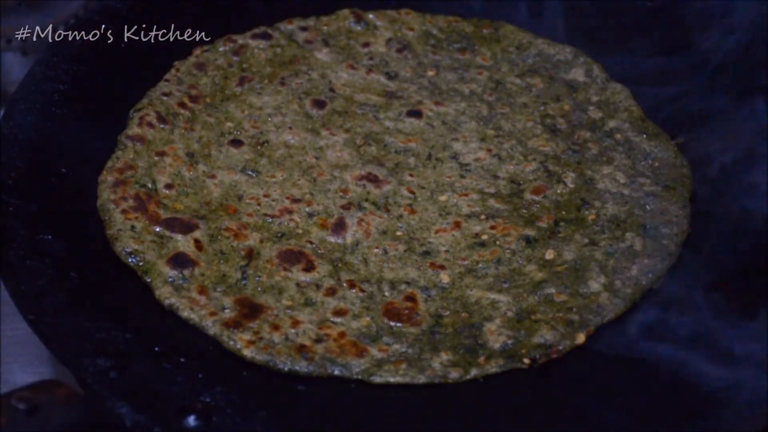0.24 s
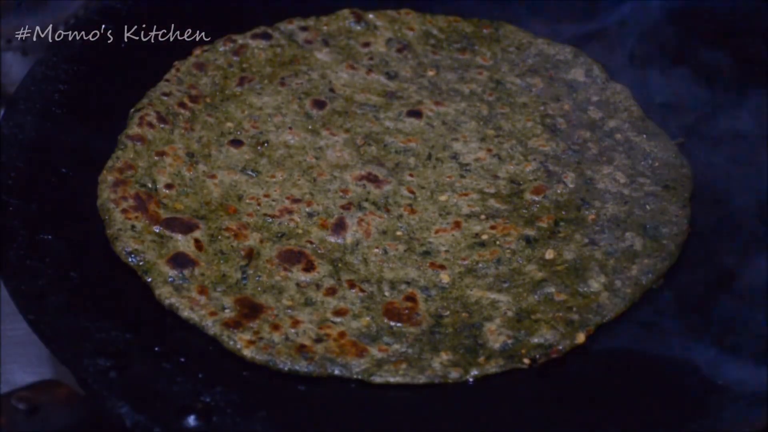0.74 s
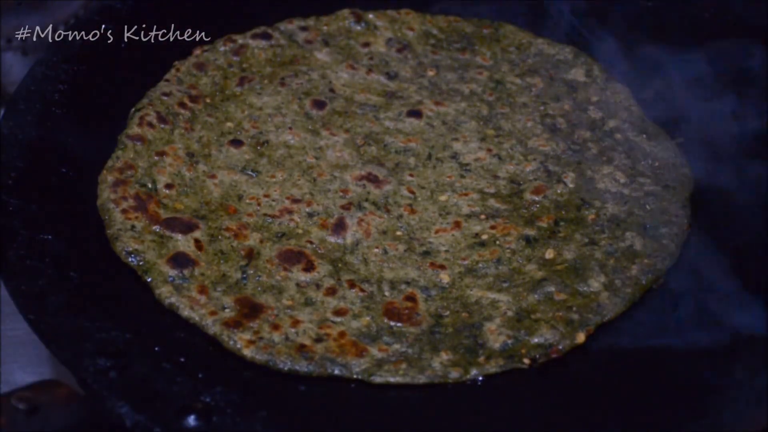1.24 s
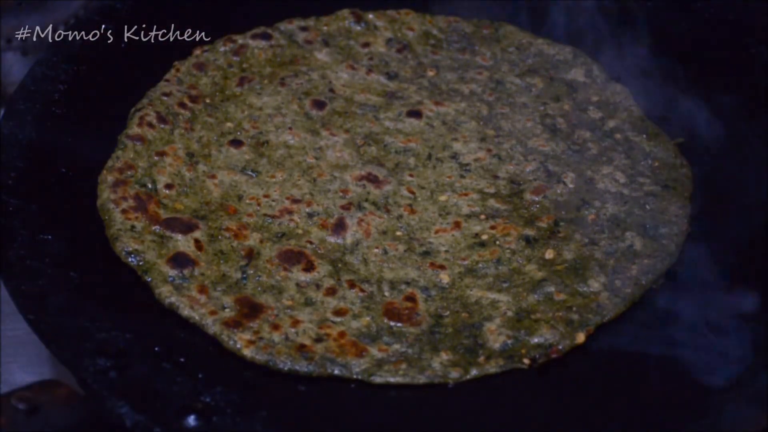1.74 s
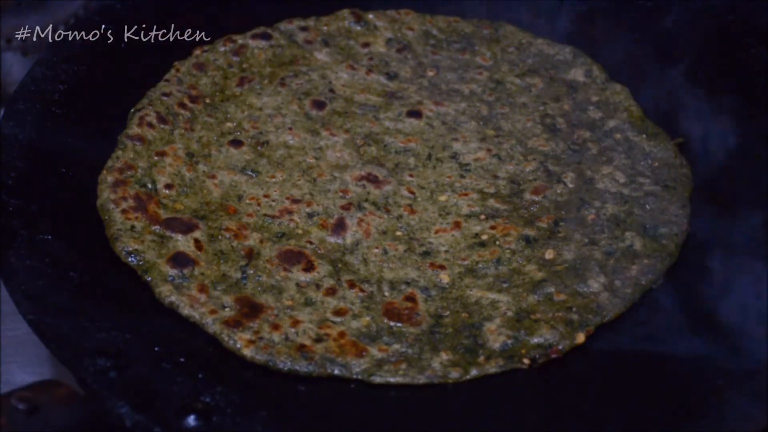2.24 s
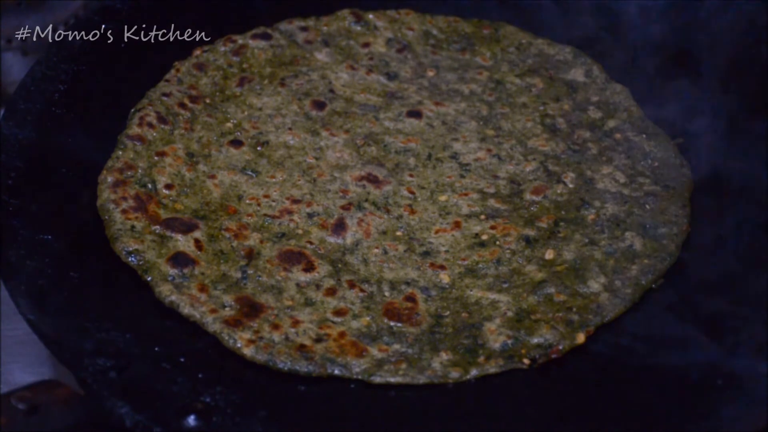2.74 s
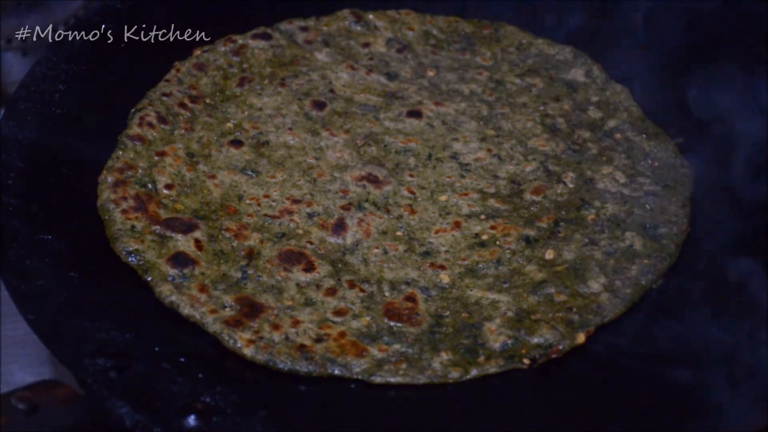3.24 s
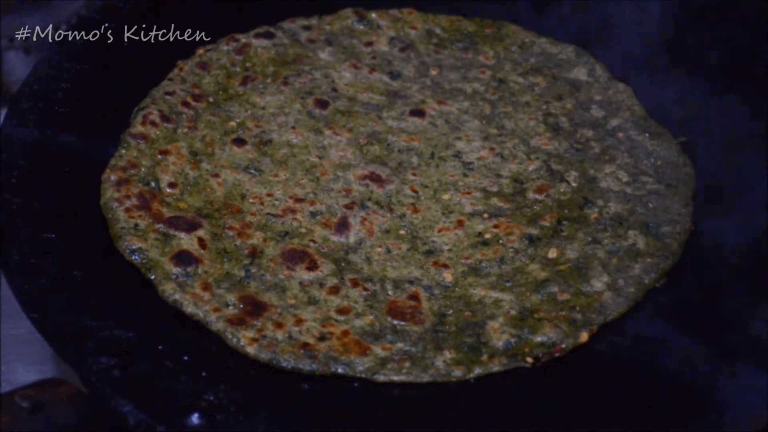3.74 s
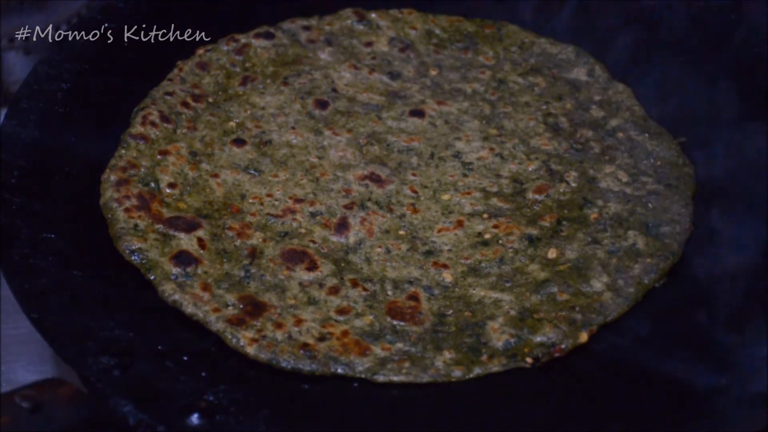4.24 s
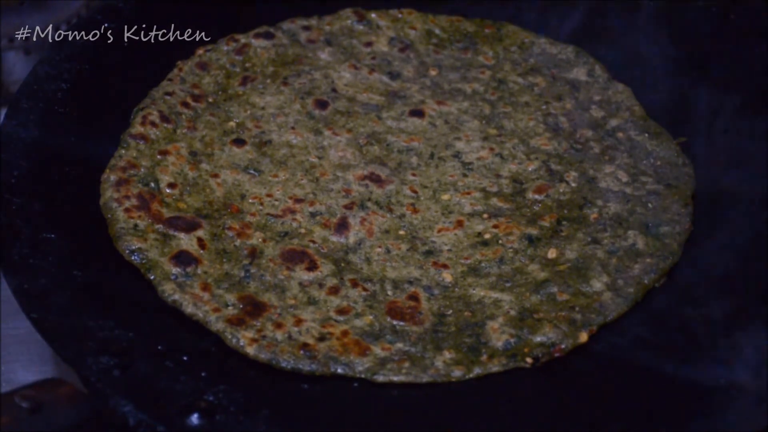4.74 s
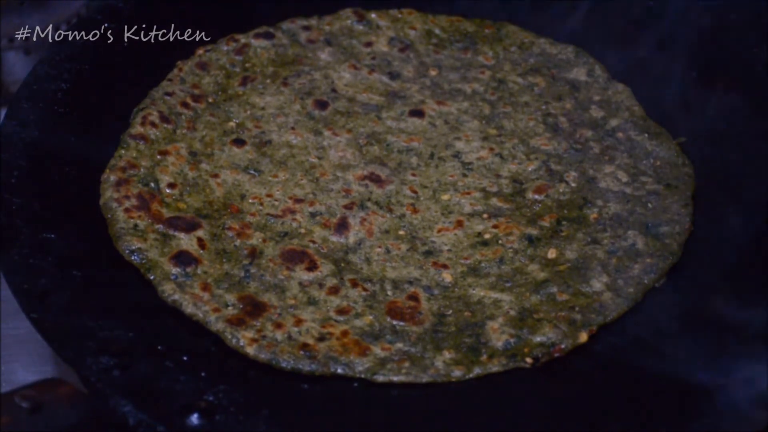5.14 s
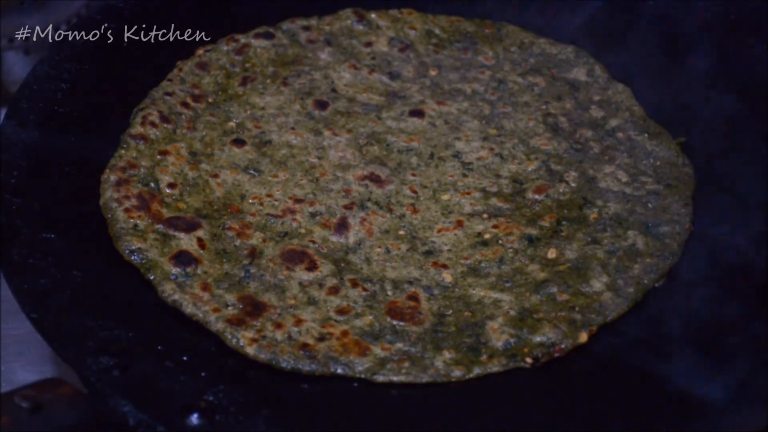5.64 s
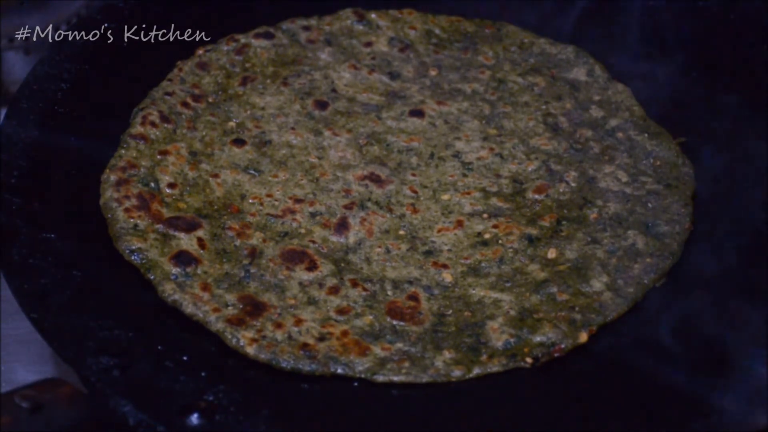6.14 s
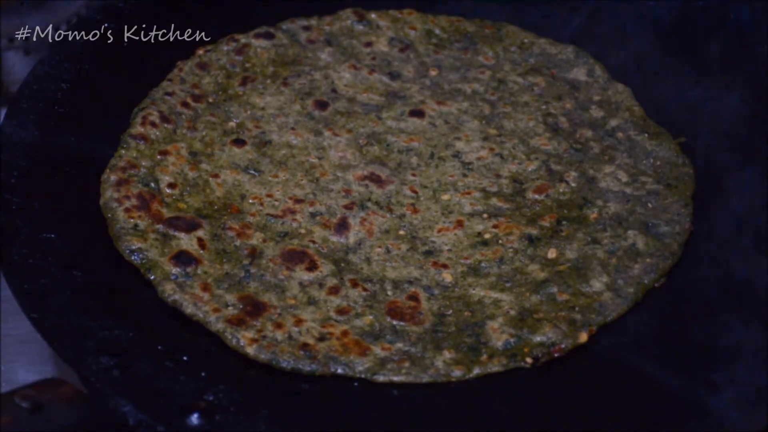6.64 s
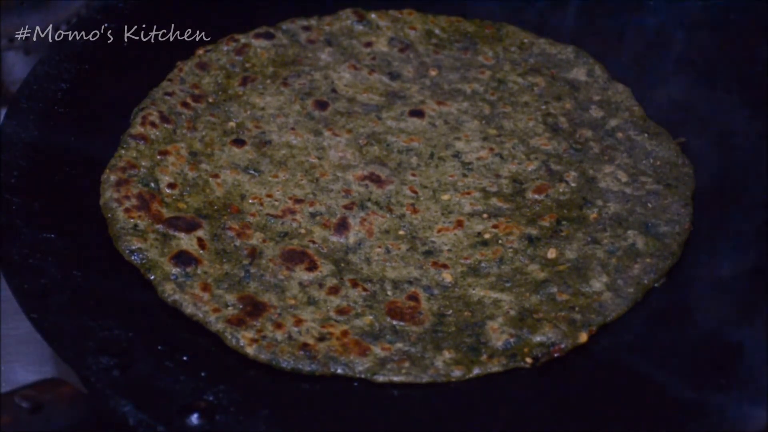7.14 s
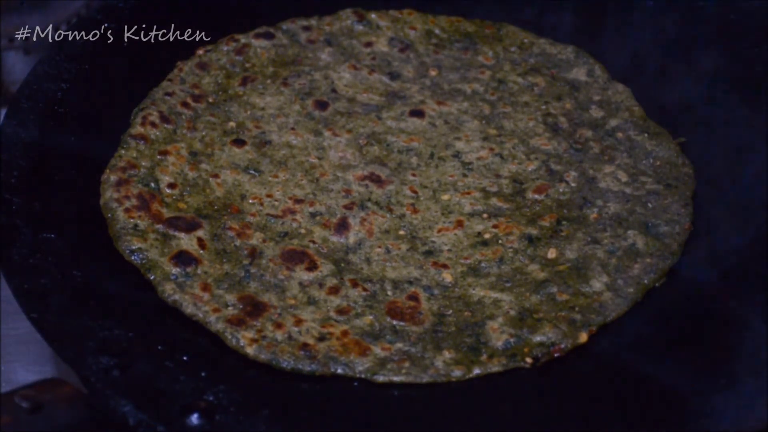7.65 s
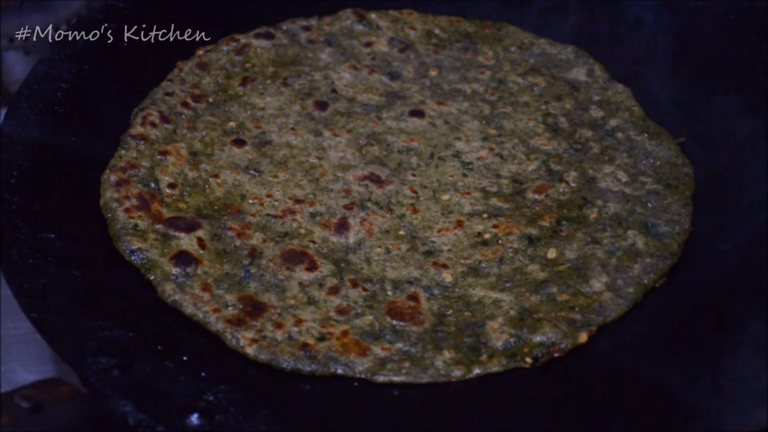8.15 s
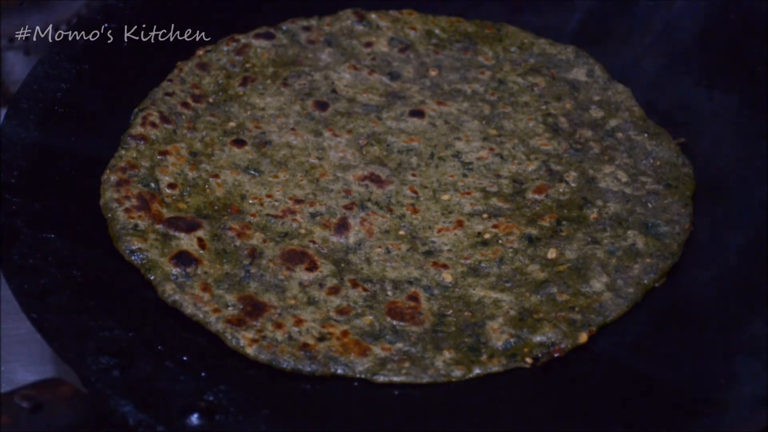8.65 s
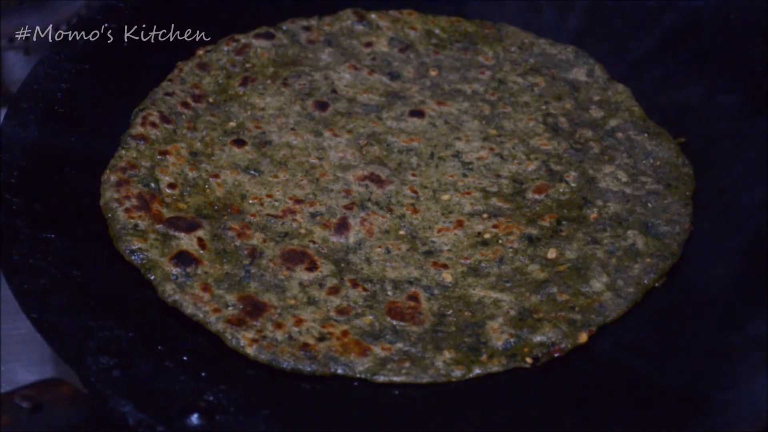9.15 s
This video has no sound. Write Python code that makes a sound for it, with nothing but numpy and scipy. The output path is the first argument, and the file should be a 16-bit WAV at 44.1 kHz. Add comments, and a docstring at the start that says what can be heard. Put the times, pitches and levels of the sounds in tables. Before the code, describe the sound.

Fat spits and pops in sharp irregular bursts as a flatbread fries on an iron griddle, with faint sizzle and low bubbling in a quiet kitchen.

```python
"""A small kitchen, the microphone close to a flatbread frying in ghee on an iron griddle.
Over a quiet stove and low bubbling, dry pops of steam blisters open the scene, then a faint spit and a strong one.
From about two seconds strong spits of fat come often and ring the griddle and the room; pops crowd in after four.
Between them steam seeps out with a faint, uneven sizzle; a spit and a few pops come near the end.
Bubbling, bursts and steam are shaped noise; each pop is a slow pressure pulse, a snap of skin and a fine spray."""
import sys
import numpy as np
from scipy import signal
from scipy.fft import rfft, irfft, next_fast_len
from scipy.io import wavfile
from scipy.ndimage import uniform_filter1d, map_coordinates

SR = 44100
rng = np.random.default_rng(int(sys.argv[2]) if len(sys.argv) > 2 else 0)


def log_audio(samples):
    """Write samples as a 16-bit WAV file to the path given in sys.argv[1]."""
    # one column per channel
    frames = np.atleast_2d(samples).T
    # limit to full scale, then quantise
    limited = np.clip(frames, -1, 1)
    pcm = np.round(limited * 32767).astype(np.int16)
    wavfile.write(sys.argv[1], SR, pcm)


N = 414099

# Quiet of the kitchen and stove. Each row: frequency [Hz], relative density [dB per Hz].
KITCHEN_COLOUR = [(25, 0), (100, 1), (300, -1), (600, 1), (1300, 0), (2000, -2), (2500, -5), (3200, -10),
                  (3900, -12), (4700, -16), (7000, -17.5), (8500, -21), (11000, -23.5), (15000, -28)]
# Low knocks of bubbles under the bread. Each row: frequency [Hz], relative density [dB per Hz].
BUBBLING_COLOUR = [(15, -8), (45, 1), (110, -1), (230, -8), (420, -20), (1000, -45)]
# Low bubbling under the bread. Each row: time [s], level before the bubbling gain [dB].
BUBBLING_LEVELS = [(0, -64), (0.4, -87), (0.95, -69), (1.5, -74), (2.9, -77), (3.7, -72), (4.25, -59),
                   (4.95, -62), (5.15, -70), (6.1, -60), (6.9, -76), (7.8, -77), (7.95, -59), (8.25, -66),
                   (8.5, -58.5), (9.39, -59)]
# Trace of hiss between the ears. Each row: frequency [Hz], relative density [dB per Hz].
SIDE_HISS_COLOUR = [(100, 16.0), (1000, 0), (4000, -3), (12000, 2.5), (16000, 10)]
# Fine fizz of steam through fat. Each row: frequency [Hz], relative density [dB per Hz].
FIZZ_COLOUR = [(1200, -6), (3000, -1), (4200, -1), (5200, 2), (6200, -1), (7600, 1), (9800, -5),
               (11400, -2), (13000, -8), (16000, -19)]
# Narrow jet at the rim of the bread. Each row: frequency [Hz], relative density [dB per Hz].
JET_COLOUR = [(2000, -12), (3500, -9), (4600, -7), (5250, 1), (5900, -7), (7000, -10), (8500, -20),
              (9800, -15), (13000, -27)]
# Wisps of steam fizzing through the fat. Each row: middle [s], length [s], peak before flicker [dB].
STEAM_WISPS = [(0.278, 0.14, -73.5), (1.1, 0.45, -73), (1.6, 0.28, -74), (3.185, 0.11, -69),
               (3.502, .19, -65), (5.143, 0.032, -66.5), (5.417, 0.18, -66), (7.416, 0.15, -72),
               (8.38, .15, -70)]
# Jets of steam from the rim. Each row: middle [s], length [s], peak before flicker [dB].
RIM_JETS = [(2.767, 0.55, -76), (4.683, 0.24, -69), (5.017, 0.091, -75), (6.68, 0.29, -68),
            (8.68, .25, -68.5)]
# Bursting blisters. Each row: snap time [s], puff level before its gain [dB], puff pitch before the
# depth factor [Hz], snap level before its gain [dB], spray level before its gain [dB].
BLISTER_POPS = [(0.1578, -21.5, 264, -20.5, -48), (0.1815, -30.5, 231, -50, -75),
                (0.2055, -37, 276, -33.5, -68), (0.2682, -64, 400, -25, -59),
                (0.9197, -22.5, 213, -42, -89), (1.0632, -14, 147, -21.5, -89),
                (1.1414, -22.5, 306, -23, -64), (1.1702, -56, 342, -29, -46), (1.654, -38, 220, -59, -90),
                (2.08, -25, 129, -65, -85), (2.1183, -28, 250, -28, -63), (2.478, -29.5, 149, -51, -80),
                (2.6307, -30, 186, -52, -89), (2.663, -33.5, 181, -44, -92), (3.2173, -30, 157, -23.5, -55),
                (3.4557, -15, 180, -16.5, -54.5), (4.0023, -22, 197, -20.5, -60),
                (4.2043, -52, 370, -16.5, -59), (4.2126, -33, 142, -64, -90), (4.241, -38, 261, -22, -65),
                (4.307, -23.5, 190, -20, -47.5), (4.379, -34, 175, -23, -66), (4.7414, -32, 233, -36, -77),
                (4.7509, -34, 261, -26.5, -66), (4.77, -31, 170, -17.5, -59), (4.788, -35, 218, -30, -86),
                (4.8163, -43, 291, -21, -61), (4.9112, -25, 242, -23.5, -50.5),
                (4.9458, -22.5, 113, -52, -97), (5.0302, -33, 246, -21.5, -57),
                (5.381, -12.5, 123, -11.5, -50), (5.459, -33, 247, -31.5, -58),
                (5.4854, -27, 180, -28.5, -54), (5.5056, -34, 161, -32.5, -68),
                (5.5913, -18.5, 186, -10.5, -46.5), (5.847, -35, 250, -42, -50),
                (5.8941, -25, 151, -53, -80), (5.9074, -33, 178, -18.5, -59),
                (5.9888, -43, 295, -29.5, -70), (6.0022, -24.5, 195, -31.5, -60),
                (6.1255, -24, 276, -20.5, -56), (6.222, -31, 190, -62, -97), (6.3141, -56, 182, -27.5, -83),
                (6.546, -26, 191, -40, -84), (6.5706, -14, 240, -27, -70), (6.588, -44, 192, -32, -62),
                (7.1556, -21, 273, -44, -80), (7.2725, -14, 332, -22, -44), (7.492, -28.5, 75.5, -57, -90),
                (7.7807, -15.5, 181, -12, -48), (8.339, -24.5, 118, -59, -98), (8.5436, -29, 92, -74, -95),
                (8.6119, -32.5, 113, -39, -82), (8.7087, -28.5, 170, -39, -85),
                (8.9913, -24.5, 99, -32.5, -88), (9.0066, -23.5, 215, -28.5, -65),
                (9.0171, -28, 183, -21, -63), (9.0838, -32, 338, -30, -52.5),
                (9.1238, -25.5, 190, -17, -54), (9.277, -24, 175, -15.5, -54)]
# Spits of fat. Each row: start [s], body level [dB], ring level [dB], crack level [dB],
# ring pitch [Hz], rise [s], decay [s]; rise and decay have small floors.
FAT_SPITS = [(0.392, -58.5, -66, -64.5, 1280, .0004, 0.0063), (0.506, -37.5, -35, -41, 1282, 0.00017, 0.02),
             (0.654, -58, -55, -67, 1230, .0008, 0.0037), (0.775, -63, -59.5, -58.5, 1360, 0.0078, 0.043),
             (0.843, -58, -70, -70, 1240, .0027, .0066), (1.289, -46.5, -43, -56, 1348, 0.00053, 0.014),
             (1.44, -56.5, -64, -80, 1240, 0.0023, 0.0034), (1.523, -68, -78, -65, 1350, .0044, .012),
             (2.101, -51, -55, -48.5, 1420, .012, .007), (2.123, -35, -38, -41, 1300, 0.0012, 0.009),
             (2.141, -40, -35, -48.5, 1245, .0008, 0.041), (2.365, -44.5, -41, -46, 1344, 0.0012, .016),
             (2.991, -37.5, -37.5, -41, 1305, 0.00036, .01), (3.167, -42.5, -38, -47, 1185, .0022, .008),
             (3.446, -45.5, -47.5, -57, 1204, 0.001, 0.0081),
             (3.818, -52, -57, -51.5, 1240, 0.0033, 0.0035), (3.83, -40, -39, -46.5, 1230, .0056, .006),
             (3.884, -46.5, -44, -59, 1230, 0.0045, 0.0098),
             (4.301, -37.5, -37.5, -46.5, 1218, .0034, 0.012), (4.477, -36, -29.5, -39, 1184, .0004, .0033),
             (4.836, -35.5, -41, -44.5, 1090, 0.00054, 0.0079),
             (5.058, -36, -30.5, -41.5, 1216, 0.00097, 0.0022),
             (5.372, -37.5, -41, -45, 1290, 0.00072, 0.0035),
             (5.6347, -39, -34, -46, 1060, 0.00045, 0.0061),
             (5.859, -38, -40.5, -45.5, 1074, .0003, 0.0067), (6.418, -51, -46, -60.5, 1240, .0004, 0.011),
             (6.859, -51, -57, -63, 1104, .005, 0.0038), (7.14, -48.5, -43, -61, 1420, .0005, 0.004),
             (7.447, -62, -57, -57, 1280, .0036, .027), (7.469, -45.5, -36.5, -32.5, 1393, .006, .013),
             (7.896, -44, -52.5, -60, 1240, 0.00027, 0.0021), (8.345, -37, -41, -44, 1334, 0.0041, .008),
             (8.765, -35.5, -30.5, -42, 1178, .0004, 0.0032),
             (9.038, -37.5, -40.5, -46.5, 1236, 0.00059, 0.014),
             (9.3121, -34, -32.5, -38, 1357, .0004, 0.01)]
# Resonances of the griddle. Each row: frequency [Hz], width [Hz], relative level before scatter [dB].
GRIDDLE_MODES = [(583.5, 37, 7.5), (748.4, 33, 6), (887, 16, 3), (1088, 55, -2.5), (1216, 23, 5.5),
                 (1298, 49, 3.5), (1822, 113, -5), (2164, 17, -7), (2400, 140, -11), (2700, 290, -13),
                 (3350, 15, -18.5), (4090, 210, -29.5)]
# Colour of a burst of fat. Each row: frequency [Hz], relative density [dB per Hz].
BURST_COLOUR = [(60, -32), (380, -1.5), (520, 1), (1250, 0), (1550, -6.5), (2000, -2), (2750, -17),
                (3200, -16), (4500, -23), (7000, -30), (10000, -41), (15000, -60)]
# Body, ring, crack and spray ranges, low to high. Each row: top edge [Hz], room tail [dB], room t60 [s].
ROOM_RANGES = [(1038, -10, 0.36), (1645, -8, 0.3), (3254, -9, 0.31), (16000, -14.5, 0.27)]

TOP_HZ = 15800  # band limit of the recorder
STIR_DB, STIR_S = -27.5, 0.073  # bubbling stirred up by a spit: level relative to its body, decay
WISP_JET_DB = -7  # part of each wisp leaves by the rim
SKIN_HZ, SPRAY_DB = 1485, -37.5  # a usual blister: pitch of its snap, spray relative to the snap
SKIN_OCTAVES_PER_DB = 0.04  # a tighter skin throws more spray and snaps higher
MIST_DB, MIST_PER_BODY_DB = -8.5, 0.24  # spray relative to the crack; more body than ring throws more


def amp(db):
    """Decibels to gain."""
    return 10 ** (np.asarray(db) / 20)


def rms(x):
    """Root mean square."""
    return np.sqrt(np.mean(x ** 2) + 1e-24)


def colour(points, hz):
    """Gain of (Hz, dB) points on a log frequency axis."""
    point_hz, db = np.transpose(points)
    return amp(np.interp(np.log(hz + 1), np.log(point_hz), db))


def wobble(rate):
    """A smooth random curve, rate knots a second."""
    knots = rng.standard_normal(int(N * rate / SR) + 4)
    return map_coordinates(knots, [np.arange(N) * rate / SR])


def filtered(x, response):
    """Filter x by a response of frequency, with silence padded after it."""
    n = x.shape[-1]
    padded = next_fast_len(n + 4096)
    spectrum = rfft(x, padded) * response(np.fft.rfftfreq(padded, 1 / SR))
    return irfft(spectrum, padded)[..., :n]


def noise(points):
    """Coloured noise of rms 1."""
    x = filtered(rng.standard_normal(N), lambda hz: colour(points, hz))
    return x / rms(x)


def resonance(hz, centre, width):
    """Response of one damped mode, gain 1 at its centre."""
    return 1j * hz * width / (centre ** 2 - hz ** 2 + 1j * hz * width)


def swells(rows):
    """A bell-shaped swell for each (middle s, length s, dB) row."""
    t = np.arange(N) / SR
    return sum(amp(db) * np.exp(-2 * ((t - middle) / length) ** 2) for middle, length, db in rows)


def add(track, s, sound):
    """Mix a sound into the track at time s."""
    start = max(round(s * SR), 0)
    part = track[start:start + len(sound)]
    part += sound[:len(part)]


def kitchen(level_db=-64.0):
    """The quiet of the kitchen and stove: steady coloured noise that wavers slightly."""
    return amp(level_db + 0.24 * wobble(4.5)) * noise(KITCHEN_COLOUR)


def bubbling(gain_db=-2.5):
    """Low bubbling under the bread, stirred up by each spit: low noise in uneven lumps."""
    times, levels = np.transpose(BUBBLING_LEVELS)
    strength = amp(np.interp(np.arange(N) / SR, times, levels) + gain_db)
    t = np.arange(SR // 2) / SR
    for s, body_db, *_ in FAT_SPITS:
        add(strength, s, amp(body_db + STIR_DB) * np.exp(-t / STIR_S))
    lumps = amp(4 * wobble(30))
    return strength * lumps * noise(BUBBLING_COLOUR)


def sizzle(patch_db=1.7, grain_db=1.5):
    """Steam seeps through the fat in short swells: a fine fizz and a narrow jet at the rim."""
    fizz = swells(STEAM_WISPS)
    jet = swells(RIM_JETS) + amp(WISP_JET_DB) * fizz
    steam = fizz * noise(FIZZ_COLOUR) + jet * noise(JET_COLOUR)
    # the gaps keep changing shape, so narrow bands of the hiss come and go
    bands = signal.stft(steam, nperseg=512)[2]
    patches = uniform_filter1d(rng.standard_normal(bands.shape), 8, 0)  # across frequency
    patches = uniform_filter1d(patches, 16, 1)  # across time
    bands = bands * amp(patch_db * patches / rms(patches))
    steam = signal.istft(bands, nperseg=512)[1][:N]
    return steam * amp(grain_db * wobble(1000))


def pop(puff_db, puff_hz, snap_db, snap_hz, spray_db,
        lead_cycles=0.026, spike_cycles=0.19, rebound_gain=0.15,
        skin_gain=0.18, skin_decay_cycles=0.33, leak_gain=0.62, edge_ratio=1.78,
        spray_decay_s=0.00085, spray_hz=5200):
    """A blister swells and collapses in one slow cycle; its skin snaps, rebounds and throws a fine spray."""
    t = np.arange(-SR // 50, SR // 50) / SR  # the snap falls 20 ms in
    after = np.maximum(t, 0)
    phase = 2 * np.pi * (puff_hz * t + lead_cycles)
    puff = -phase * np.exp((1 - phase * phase) / 2)

    def spike(delay):
        """A bell-shaped pressure pulse of the skin."""
        return np.exp(-((t - delay) * snap_hz / spike_cycles) ** 2)

    skin = np.sin(2 * np.pi * snap_hz * 1.28 * after)
    skin *= skin_gain * np.exp(-after * snap_hz / skin_decay_cycles)
    rebound = rebound_gain * spike(rng.uniform(0.4, 1.8) / snap_hz)
    snap = spike(0) + rebound + skin
    # the soft skin passes less above its own highest mode
    snap = filtered(snap, lambda hz: leak_gain + (1 - leak_gain) / (1 + (hz / (edge_ratio * snap_hz)) ** 20))

    centre = min(spray_hz * rng.lognormal(0, .2), 8000)
    spray = rng.standard_normal(len(t)) * (t > 0) * np.exp(-after / spray_decay_s)
    spray = filtered(spray, lambda hz: resonance(hz, centre, .8 * centre) ** 2 / (1 + (hz / 11000) ** 10))
    spray /= rms(spray[(t > 0) & (t < .002)])  # level taken over its first 2 ms
    return amp(puff_db) * puff - amp(snap_db) * snap + amp(spray_db) * spray


def blisters(puff_gain_db=-9.0, snap_gain_db=1, spray_gain_db=1, depth=0.9,
             small_db=-57, small_spread_db=9, lag_s=0.037, count=30):
    """Steam blisters burst in clear pops, and set off faint ones nearby a moment later."""
    out = np.zeros(N)
    for s, puff_db, puff_hz, snap_db, spray_db in BLISTER_POPS:
        tightness_db = spray_db - snap_db - SPRAY_DB
        snap_hz = SKIN_HZ * 2 ** (SKIN_OCTAVES_PER_DB * tightness_db)
        sound = pop(puff_db + puff_gain_db, puff_hz * depth,
                    snap_db + snap_gain_db, snap_hz, spray_db + spray_gain_db)
        add(out, s - 1 / 50, sound)
    for which, wait, size, pitch in rng.random((count, 4)):
        s = BLISTER_POPS[int(which * len(BLISTER_POPS))][0] + lag_s * wait
        db = small_db + small_spread_db * size
        add(out, s - 1 / 50, pop(db, 70 + 100 * pitch, db - 16, 1100 + 900 * pitch, db - 35))
    return out


def spits(ring_db=5, ring_width_hz=55, ragged_db=1.5, direct_decay_s=0.0037,
          linger_db=-31, linger_t60_s=1.6, mode_scatter_db=2.5):
    """Water flashes to steam in the fat: a ragged burst rings the griddle and dies away in the room."""
    out = np.zeros(N)
    t = np.arange(3 * 2 ** 13) / SR
    hz = np.fft.rfftfreq(len(t), 1 / SR)
    # power responses of the griddle, and the share of power in each range
    modes = np.array([(2 * amp(db) * abs(resonance(hz, f, w)) ** 2) ** 2 for f, w, db in GRIDDLE_MODES])
    below = [0 * hz] + [1 / (1 + (hz / edge) ** 16) for edge, _, _ in ROOM_RANGES]
    shares = np.abs(np.diff(below, axis=0))
    fat = colour(BURST_COLOUR, hz) ** 2
    # loudness is followed on a coarse clock: a direct blow, then the room's echo
    slow = t[::32]
    direct = np.exp(-slow / direct_decay_s)
    linger = amp(linger_db - 60 * slow / linger_t60_s)
    echoes = [direct + amp(db) * (amp(-60 * slow / t60) + linger) for _, db, t60 in ROOM_RANGES]

    for s, body, ring, crack, pitch, rise, decay in FAT_SPITS:
        mist = crack + MIST_DB + MIST_PER_BODY_DB * (body - ring)
        # each spot on the griddle favours other modes
        scatter = amp(mode_scatter_db * rng.standard_normal(len(modes))) ** 2
        power = fat + scatter @ modes
        power += (2 * amp(ring_db) * abs(resonance(hz, pitch, ring_width_hz)) ** 2) ** 2
        random_phase = np.exp(2j * np.pi * rng.random(shares.shape))
        waves = irfft(np.sqrt(power * shares) * random_phase, len(t))
        # the burst is a quick volley of tiny explosions
        volley = amp(ragged_db * rng.standard_normal(len(slow)))
        attack = 1 - np.exp(-slow / max(rise, 1e-4))
        burst = volley * attack * np.exp(-slow / max(decay, 1e-3))
        for wave, db, echo in zip(waves, (body, ring, crack, mist), echoes):
            loudness = np.sqrt(np.convolve(burst ** 2, echo ** 2)[:len(slow)])
            band = wave * np.interp(t, slow, loudness)
            add(out, s, amp(db) * band / rms(band[:SR // 20]))  # level taken over its first 50 ms
    return out


def scene(width_db=-82, lean_db=0.02):
    """Everything sits almost in the centre; beyond a tiny lean only a trace of hiss differs between the ears."""
    mid = kitchen() + bubbling() + sizzle() + blisters() + spits()
    side = amp(width_db) * noise(SIDE_HISS_COLOUR)
    return np.array([amp(lean_db) * mid + side, mid - side])


def record(dry, low_cut_hz=27):
    """The microphone sheds the deepest bass and the recorder keeps nothing above its band limit."""
    return filtered(dry, lambda hz: hz ** 2 / np.hypot(hz ** 2, low_cut_hz ** 2) * (hz < TOP_HZ))


dry = scene()
out = record(dry)
log_audio(out)
```